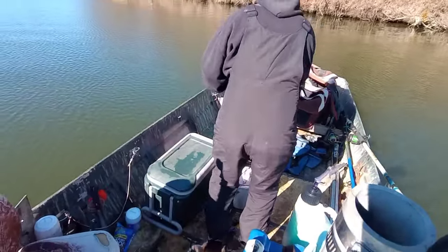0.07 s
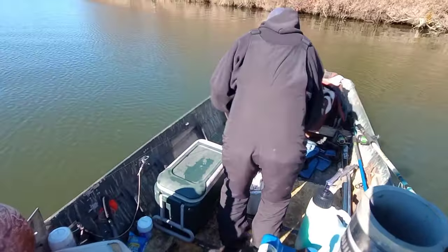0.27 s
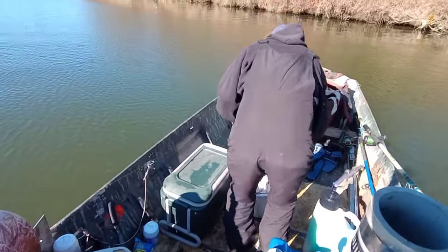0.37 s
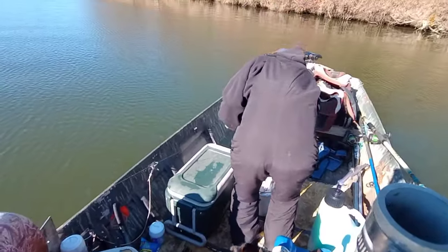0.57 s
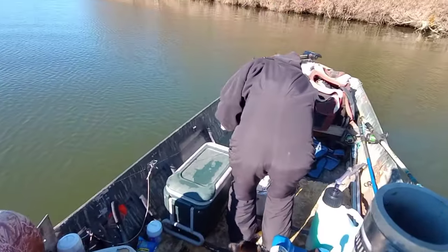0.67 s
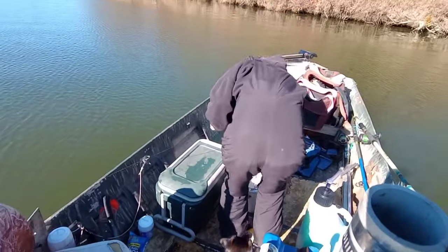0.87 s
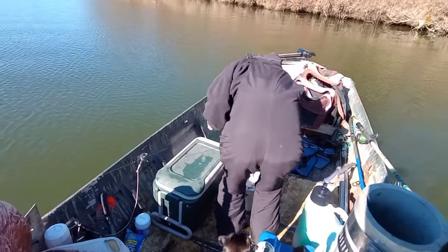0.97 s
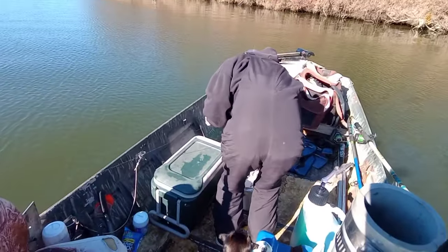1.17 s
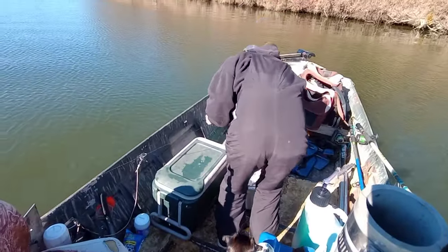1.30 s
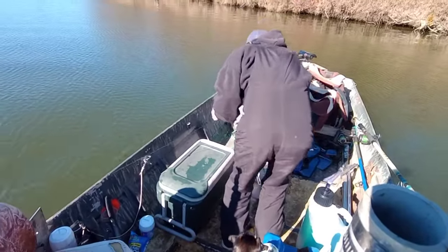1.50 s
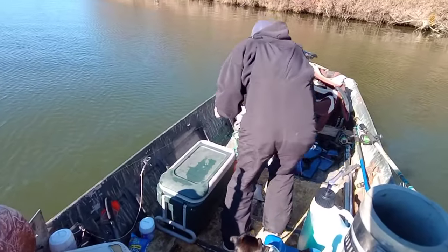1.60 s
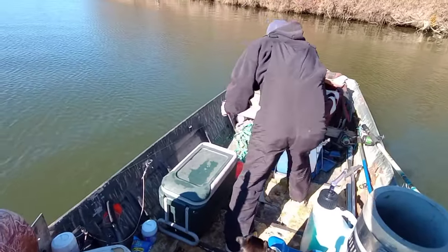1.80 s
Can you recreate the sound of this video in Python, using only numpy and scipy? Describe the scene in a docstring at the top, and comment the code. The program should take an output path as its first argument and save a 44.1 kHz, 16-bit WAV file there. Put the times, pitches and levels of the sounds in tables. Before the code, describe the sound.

A hard hollow knock on a small aluminium boat, then lighter thuds, rumble and gear scuffs

```python
"""Moving about in a small aluminium boat

Someone shifts gear on a quiet river. One hard knock and a string of lighter ones ring decaying hull and panel
modes over noise bursts. The hull rumbles as wandering tones plus noise under the shifting load.
Boots and gear scuff: tiny random slips through floor resonances, grit and hiss. Open air, hardly any echo."""
import sys
import numpy as np
from scipy import signal
from scipy.fft import rfft, irfft
from scipy.io import wavfile
from scipy.ndimage import uniform_filter1d

SR = 44100
rng = np.random.default_rng(int(sys.argv[2]) if len(sys.argv) > 2 else 0)


def to_wav(sig):
    """Store sig (one row per channel, or 1-D mono) as 16-bit WAV at the path in sys.argv[1].

    Samples outside -1..1 are clipped; the rate is SR.
    """
    pcm = np.clip(np.atleast_2d(sig), -1, 1) * 32767
    pcm = np.round(pcm).astype(np.int16)
    wavfile.write(sys.argv[1], SR, pcm.T)  # frames by channels


N = 81585
TIME_S = np.arange(N) / SR
BINS_HZ = np.linspace(0, SR / 2, N + 1)   # bins of an FFT padded to 2 N


def from_db(db):
    """Decibels to amplitude gain."""
    return 10 ** (np.asarray(db) / 20)


def rms_one(x):
    """Scale to rms 1."""
    return x / np.sqrt(np.mean(x ** 2) + 1e-20)


def at_hz(points, hz):
    """Read a table on a log-frequency axis."""
    table_hz, value = np.transpose(points)
    return np.interp(np.log(hz + 1e-9), np.log(table_hz), value)


def colour(x, spectrum):
    """Filter x to a spectrum, 12 dB per octave down below its first point; rms 1."""
    below = np.minimum(1, BINS_HZ / spectrum[0][0]) ** 2
    gain = below * from_db(at_hz(spectrum, BINS_HZ))
    return rms_one(irfft(rfft(x, 2 * N) * gain)[..., :N])


def resonate(x, resonances):
    """Parallel steep resonances; rms 1."""
    out = 0
    for hz, width_hz, db in resonances:
        edges_hz = [max(hz - width_hz / 2, 20), hz + width_hz / 2]
        band = signal.butter(2, edges_hz, "band", fs=SR, output="sos")
        out = out + from_db(db) * signal.sosfilt(band, x)
    return rms_one(out)


def steady(x, size):
    """Even out the level of x over size samples."""
    return x / np.sqrt(np.abs(uniform_filter1d(x * x, size)) + 1e-3)


def ports(x, phase):
    """Sound reaches the two microphone ports with a phase difference."""
    lead_rad = np.interp(BINS_HZ, *np.transpose(phase))
    turn = np.exp(.5j * lead_rad * np.array([[1], [-1]]))
    return irfft(rfft(x, 2 * N) * turn)[:, :N]


# far river and air: hz, level_db_per_hz (relative)
AIR_SPECTRUM = [(25, -2.5), (100, 2), (250, -9.5), (550, -4.5), (1000, -11), (2000, -14.5), (4000, -19),
                (8000, -20), (15000, -33.5)]
AIR_DB = -80.5


def air():
    """Faint hush of the river bank: coloured noise, partly shared by the ports."""
    hush = rng.standard_normal(N) + .7 * rng.standard_normal((2, N))
    return from_db(AIR_DB) * colour(hush, AIR_SPECTRUM)


# hull level under the shifting load: time_s, deep_boom_db, upper_boom_db
RUMBLE_LEVELS = [(0, -90, -99), (.24, -92, -99), (.3, -42.5, -52.5), (.43, -55.5, -66), (.47, -68, -72),
                 (.54, -44.5, -44), (.6, -50.5, -62.5), (.66, -55, -49.5), (.7, -45.5, -58.5),
                 (.775, -45.5, -55.5), (.825, -57, -54), (.875, -47.5, -43), (.94, -53, -51),
                 (.995, -47.5, -45.5), (1.06, -53.5, -54), (1.11, -60.5, -65), (1.17, -52, -63.5),
                 (1.3, -88, -98), (1.37, -70, -74), (1.43, -92.5, -91.5), (1.62, -94, -95), (1.7, -62, -59),
                 (1.785, -54.5, -71), (1.85, -83.5, -91.5)]
# deep boom, upper boom: pitch_hz, wander_rms_hz, noise_centre_hz, noise_width_hz, noise_db (re tone)
HULL_BOOMS = [(114, 8, 101.5, 60, -6), (242.3, 5, 195, 70, -4)]
WANDER_CUTOFF_HZ = 14


def rumble():
    """The shifting load keeps two hull resonances going; their pitch wanders as the sheet flexes."""
    time_s, *levels_db = np.transpose(RUMBLE_LEVELS)
    slow = signal.butter(2, WANDER_CUTOFF_HZ, fs=SR, output="sos")
    out = 0
    for level_db, (hz, wander_hz, noise_hz, width_hz, noise_db) in zip(levels_db, HULL_BOOMS):
        flex = rms_one(signal.sosfilt(slow, rng.standard_normal(N)))
        cycles = np.cumsum(hz + wander_hz * flex) / SR
        tone = np.sqrt(2) * np.sin(2 * np.pi * cycles)
        noise = resonate(rng.standard_normal(N), [(noise_hz, width_hz, 0)])
        boom = rms_one(tone + from_db(noise_db) * steady(noise, size=1500))
        out = out + from_db(np.interp(TIME_S, time_s, level_db)) * boom
    return out


SLIPS_PER_S, SLIP_SPREAD_DB = 2500, 3   # mean rate; scale of the exponential spread


def slips():
    """Dense tiny slips of uneven size and random sign."""
    size_db = SLIP_SPREAD_DB * np.minimum(rng.exponential(1, N), 4)
    sizes = from_db(size_db) * rng.choice([-1, 1], N)
    return sizes * (rng.random(N) < SLIPS_PER_S / SR)


# boots and gear: start_s, rise_s, hold_s, fall_60db_s, dull_body_db, hollow_db, hollow_hz,
# upper_hollow_db, grit_db, hiss_db
SCUFF_STROKES = [(.025, .012, .018, 0.06, -88, -49, 491, -58, -48, -55),
                 (.06, 0.014, .028, .12, -73, -68, 555, -80, -69, -81),
                 (0.258, 0.019, .02, 0.15, -48.5, -51.5, 535, -56, -60.5, -90),
                 (0.324, .025, 0.022, 0.24, -59, -61.5, 518, -62, -71.5, -97),
                 (.483, 0.0069, 0.051, 0.2, -52.5, -50.5, 520, -55.5, -59, -75),
                 (0.564, 0.093, 0.066, 0.36, -61, -66.5, 539, -67, -70, -85),
                 (0.849, 0.019, 0.039, 0.12, -53.5, -51.5, 516, -58, -60, -87),
                 (0.932, 0.013, 0.072, 0.35, -56.5, -59.5, 548, -64.5, -70, -81.5),
                 (1.05, 0.0073, 0.024, 0.23, -65, -55, 440, -64.5, -57.5, -60),
                 (1.125, 0.019, 0.043, 0.23, -71.5, -59, 518, -61, -66.5, -77),
                 (1.327, .04, 0.041, 0.13, -65, -53, 488, -56.5, -60, -67.5),
                 (1.409, 0.034, 0.027, 0.13, -83, -60.5, 505, -62, -66.5, -69),
                 (1.459, .03, 0.027, 0.13, -89, -70.5, 568, -65, -81, -84),
                 (1.596, 0.047, 0.035, 0.1, -84, -63, 560, -83, -70.5, -80.5),
                 (1.65, 0.041, 0.047, 0.04, -55, -56.5, 470, -74, -69.5, -71.5)]
# floor resonances: pitch_hz, width_hz, level_db (relative)
DULL_FLOOR = [(180, 89, -2.5), (319.2, 100, -0.5)]
UPPER_FLOOR = [(756.5, 50, 0), (850, 60, -4.5), (1188, 120, -13)]
HOLLOW_WIDTH_HZ, HOLLOW_SKIRT_HZ, HOLLOW_SKIRT_DB = 50, 218, -6.5   # narrow resonance on a wider one
# friction spectra: hz, level_db_per_hz (relative)
GRIT_SPECTRUM = [(300, -13.5), (700, -7), (1100, 3), (1500, 1), (2100, -0.5), (2800, -6), (4200, -4),
                 (6300, -9.5), (9000, -24.5), (15000, -26.5)]
HISS_SPECTRUM = [(2000, -31), (4500, 1.5), (6500, -1), (10000, -8.5), (15000, -14)]
# left port ahead of right: hz, lead_rad
SCUFF_LEAD = [(0, 0), (600, 0.48), (850, 0.87), (1200, 0.5), (1700, -1.4), (2400, 0), (3400, 1),
              (5200, 4.5), (7000, 5), (10000, 7), (16000, 12.5)]


def scuffs():
    """Each stroke rises, holds and dies; its slips sound the hollow floor, grit and a hiss of cloth."""
    power, hollows, friction = np.zeros((4, N)), 0, slips()
    for start_s, rise_s, hold_s, fall_s, dull_db, hollow_db, hollow_hz, *upper_db in SCUFF_STROKES:
        rise = np.clip((TIME_S - start_s) / rise_s, 0, 1)
        falling_s = np.maximum(TIME_S - start_s - rise_s - hold_s, 0)
        stroke = rise * from_db(-60 * falling_s / fall_s)
        power += np.outer(from_db([dull_db, *upper_db]), stroke) ** 2
        core = (hollow_hz, HOLLOW_WIDTH_HZ, 0)
        skirt = (hollow_hz, HOLLOW_SKIRT_HZ, HOLLOW_SKIRT_DB)
        hollow = steady(resonate(friction, [core, skirt]), size=900)
        hollows = hollows + from_db(hollow_db) * stroke * hollow
    floor = [steady(resonate(slips(), group), size=900) for group in (DULL_FLOOR, UPPER_FLOOR)]
    layers = floor + [colour(slips(), GRIT_SPECTRUM), colour(slips(), HISS_SPECTRUM)]
    rubbed = (np.sqrt(power) * layers).sum(axis=0)
    return ports(hollows + rubbed, SCUFF_LEAD)


def ring(clicks, hz, t60_s):
    """A unit click sets a decaying sine of starting height 1 ringing."""
    r = from_db(-60 / (t60_s * SR))
    w = 2 * np.pi * hz / SR
    return signal.lfilter([0, np.sin(w)], [1, -2 * r * np.cos(w), r * r], clicks + 1e-18)


def struck(modes, start_s, level_db, spread_db):
    """Every blow strikes each mode with a strength of its own; modes alternate in sign."""
    out, chance = 0, rng.standard_normal((len(start_s), len(modes)))
    for k, (hz, mode_db, t60_s) in enumerate(modes):
        clicks = np.zeros(N)
        clicks[(start_s * SR).astype(int)] = from_db(level_db + mode_db + spread_db * chance[:, k])
        out = out + (-1) ** k * ring(clicks, hz, t60_s)
    return out


def dying(power, t60_s):
    """Each impulse of power decays by 60 dB in t60_s."""
    return signal.lfilter([1], [1, -from_db(-120 / (t60_s * SR))], power + 1e-18)


# decay of the crowded modes: hz, t60_s
CLATTER_DECAY = [(200, 0.082), (1000, 0.076), (3000, 0.055), (8000, 0.044), (15000, 0.043)]
# loose gear trembles on after a knock, dully
RATTLE_DB, RATTLE_T60_S, RATTLE_TOP_HZ = -20, 0.27, 1700


def clatter(spectrum, start_s, level_db, pan_db, top_hz):
    """Crowded modes: a burst that dies faster in the treble, then a faint rattle; soft contacts lack the top."""
    edges_hz = np.geomspace(100, 17000, 11)
    noise = steady(rng.standard_normal(N), size=64)
    whole = rfft(colour(noise, spectrum), 2 * N)
    blow_power = from_db(level_db + np.outer([.5, -.5], pan_db)) ** 2
    out = 0
    for low_hz, high_hz in zip(edges_hz, edges_hz[1:]):
        centre_hz = np.sqrt(low_hz * high_hz)
        blows = np.zeros((2, N))
        blows[:, (start_s * SR).astype(int)] = blow_power / (1 + (centre_hz / top_hz) ** 3)
        burst = dying(blows, at_hz(CLATTER_DECAY, centre_hz))
        rattle = from_db(2 * RATTLE_DB) * dying(blows, RATTLE_T60_S)
        rattle = rattle / (1 + (centre_hz / RATTLE_TOP_HZ) ** 2)
        band = irfft(whole * (BINS_HZ >= low_hz) * (BINS_HZ < high_hz))[:N]
        out = out + band * np.sqrt(burst + rattle)
    return out


# blows: start_s, hull_db, panel_db (before PANEL_TRIM_DB), clack_db, clack_top_hz, tick_db,
# pan_db (clack and tick, left over right)
KNOCK_BLOWS = [(0.2258, -26, -20.5, -24.5, 6000, -39, 0.5), (0.238, -29, -32.5, -40, 1500, -58, 2),
               (0.272, -47, -48, -48, 3000, -62, 2), (0.280, -54.5, -45.5, -45, 2510, -74, -1),
               (0.346, -54, -50.5, -56, 1500, -90, 0), (0.485, -50, -38, -40.5, 4050, -54.5, 1),
               (0.505, -51, -50.5, -50, 4010, -63, 1.5), (0.525, -47, -45, -52, 2000, -58, -1),
               (0.542, -42.5, -48.5, -54, 2490, -57.5, 0), (0.647, -47, -49.5, -56, 1500, -61.5, 0),
               (0.682, -42.5, -61, -69, 5000, -61, 2), (0.796, -59, -71, -64.5, 4000, -80, 1),
               (0.813, -49, -45, -44.5, 3530, -71, 2.5), (0.852, -44, -41.5, -45, 5950, -61, 2.5),
               (0.883, -52, -48.5, -57, 2000, -77, 2), (0.902, -51, -46.5, -42, 2340, -80, 4.5),
               (0.973, -43.5, -54, -55, 900, -85, 0), (1.016, -60, -48.5, -50.5, 900, -85, -6),
               (1.057, -54, -53.5, -54, 7050, -54.5, 4), (1.078, -55.5, -51, -54, 5000, -60, 4),
               (1.141, -54.5, -55.5, -57, 3000, -59, 0), (1.170, -55, -58.5, -56, 1190, -78, -4),
               (1.379, -69, -55.5, -54, 5000, -58, -2), (1.665, -68, -57, -54.5, 5030, -68, -5),
               (1.695, -51, -51.5, -44, 396, -77.5, -6), (1.728, -59, -49.5, -52, 1010, -65, -3)]
# low hull modes, then floor and side panel modes: pitch_hz, level_db (relative), t60_s
HULL_MODES = [(81, -9.5, .12), (94.8, -3.5, 0.21), (124.15, -2.5, .45), (137.5, -8, 0.27),
              (152.7, -4.5, 0.24), (176, -6.5, 0.18), (197.3, -1.5, .33), (243.7, -8.5, 0.25),
              (264, -5, .25)]
PANEL_MODES = [(299.5, -7, .13), (345, -6.5, .1), (370.8, -1, 0.15), (398.4, -6.5, .13), (519.7, -4, .14),
               (540, -5.5, .15), (567, -10, .18), (720.6, -7.5, .1), (749, -11, .12), (810.7, -6, .09),
               (900, -9, 0.092), (1052.4, -9, .11), (1200, -12.5, .13), (1410, -11, .08), (1470, -10, 0.1),
               (1935, -13, .06), (2215, -10.5, .07), (2420, -13, .05), (2670, -14, .07)]
HULL_PUSH_S, HULL_SPREAD_DB, PANEL_SPREAD_DB, PANEL_TRIM_DB = 0.0029, 2, 2.5, -5
SHEET_MODE_DB, SHEET_T60_S = -16.5, .03   # small sheet-metal modes under the clack
# contact spectra: hz, level_db_per_hz (relative)
CLACK_SPECTRUM = [(150, -5.5), (360, 6), (520, 3.5), (660, -5.5), (850, -0.5), (1250, -4), (1500, 0.5),
                  (2100, -0.5), (2600, -3.5), (3300, -11.5), (5200, -6), (7500, -16), (15000, -34)]
TICK_SPECTRUM = [(1500, -27.5), (4000, -1.5), (6500, -2.5), (10000, -5.5), (15000, -22)]
# left port ahead of right: hz, lead_rad
KNOCK_LEAD = [(0, 0.5), (330, 0), (550, -1.2), (720, 0.9), (950, 0), (1400, 3.5), (2000, 5), (2800, 2.05),
              (4100, 0.5), (5300, -2.5), (7300, -7.5), (11000, -8), (16000, -4.5)]


def knocks():
    """A blow pushes the hull softly, rings the panels and the thin sheet, and clacks at the contact."""
    start_s, hull_db, panel_db, clack_db, top_hz, tick_db, pan_db = np.transpose(KNOCK_BLOWS)
    soft = np.exp(-1 / (HULL_PUSH_S * SR))
    hull = struck(HULL_MODES, start_s, hull_db, HULL_SPREAD_DB)
    hull = signal.lfilter([2 * (1 - soft)], [1, -soft], hull)
    panels = from_db(PANEL_TRIM_DB) * struck(PANEL_MODES, start_s, panel_db, PANEL_SPREAD_DB)
    sheet_hz = np.geomspace(2400, 7000, 9) * rng.uniform(.96, 1.04, size=9)
    sheet_modes = [(hz, SHEET_MODE_DB, SHEET_T60_S) for hz in sheet_hz]
    sheet_db = clack_db + 20 * np.log10(top_hz / top_hz.max())   # duller contacts excite less sheet
    sheet = struck(sheet_modes, start_s, sheet_db, PANEL_SPREAD_DB)
    clack = clatter(CLACK_SPECTRUM, start_s, clack_db, pan_db, top_hz)
    tick = clatter(TICK_SPECTRUM, start_s, tick_db, pan_db, SR)
    return ports(hull + panels + sheet + clack + tick, KNOCK_LEAD)


SCATTER_DB, SCATTER_T60_S, SCATTER_LOW_HZ = -9, .04, 700


def scatter(x):
    """Dense, very short reflections off the boat's sides and gear, different at each port."""
    echoes = rng.standard_normal((2, N)) * from_db(-60 * TIME_S / SCATTER_T60_S)
    echoes /= np.sqrt((echoes ** 2).sum(axis=1, keepdims=True))
    bright = signal.sosfilt(signal.butter(1, SCATTER_LOW_HZ, "high", fs=SR, output="sos"), x)
    return from_db(SCATTER_DB) * signal.fftconvolve(bright, echoes, axes=1)[:, :N]


def scene():
    """Boat sounds, their scatter, and the open air."""
    boat = rumble() + scuffs() + knocks()
    return air() + boat + scatter(boat)


# microphone balance: hz, left_over_right_db
PORT_BALANCE = [(100, -1.9), (300, 1), (600, -2.5), (1400, 1.5), (2800, 1.5), (5300, -5), (8500, -0.5),
                (13000, 3.5)]
LOW_CUT_HZ, CUTOFF_HZ = 49, 15800


def record(dry):
    """The two ports differ a little in colour; the lowest bass and the top are cut."""
    tilt_db = at_hz(PORT_BALANCE, BINS_HZ)
    gain = from_db(np.outer([.5, -.5], tilt_db))
    heard = irfft(rfft(dry, 2 * N) * gain)[:, :N]
    heard = signal.sosfilt(signal.butter(2, LOW_CUT_HZ, "high", fs=SR, output="sos"), heard)
    return signal.sosfilt(signal.ellip(10, .2, 70, CUTOFF_HZ, fs=SR, output="sos"), heard)


dry = scene()
out = record(dry)
to_wav(out)
```